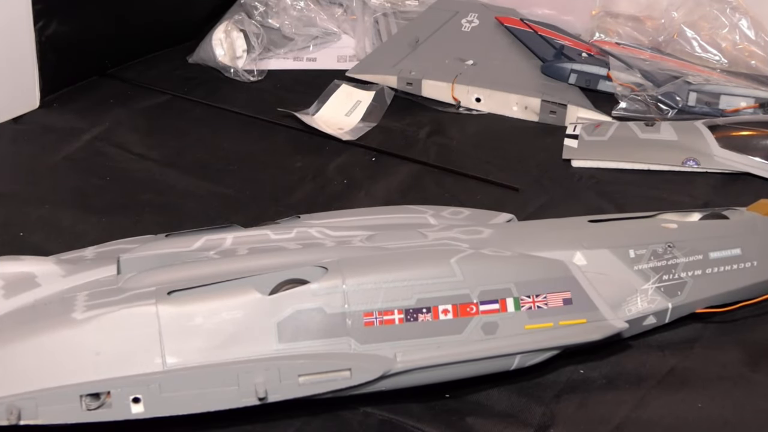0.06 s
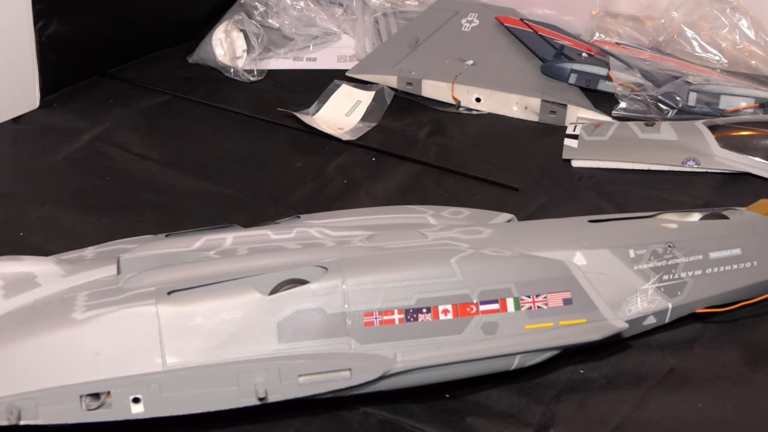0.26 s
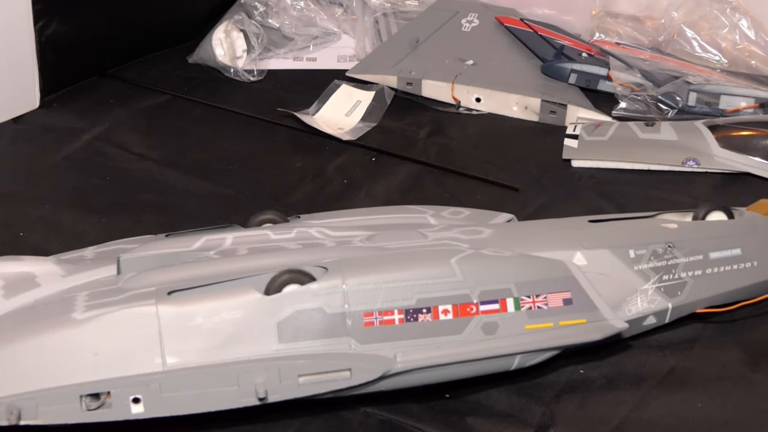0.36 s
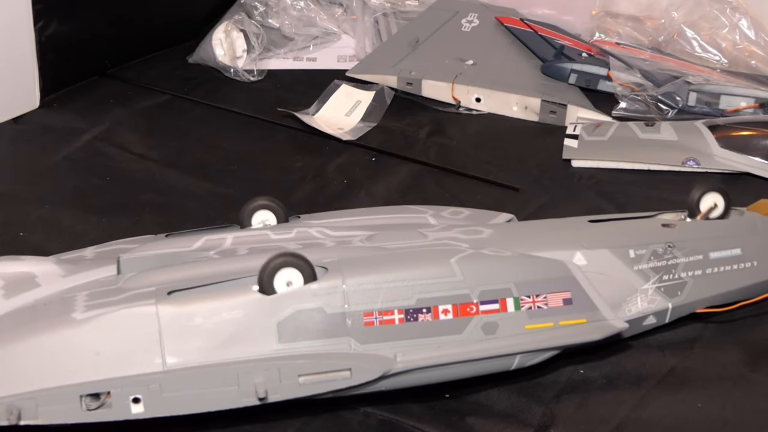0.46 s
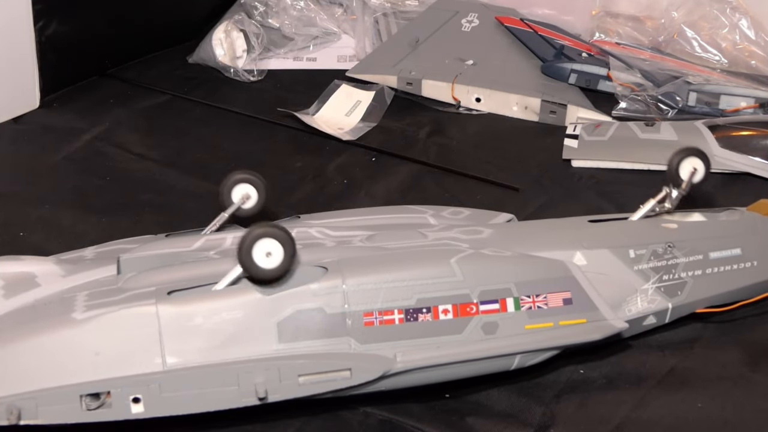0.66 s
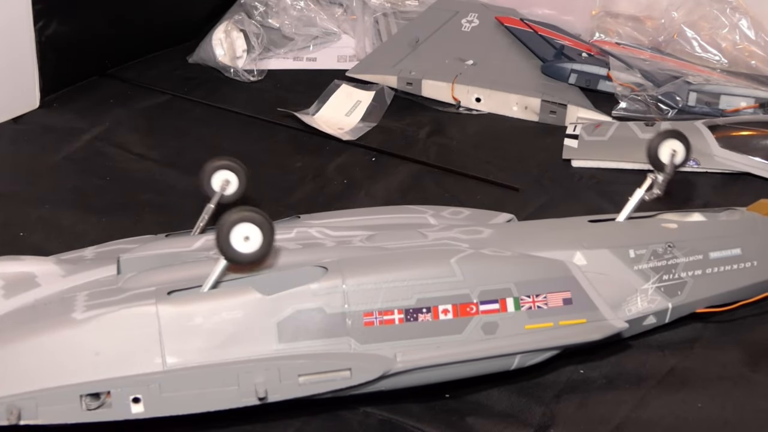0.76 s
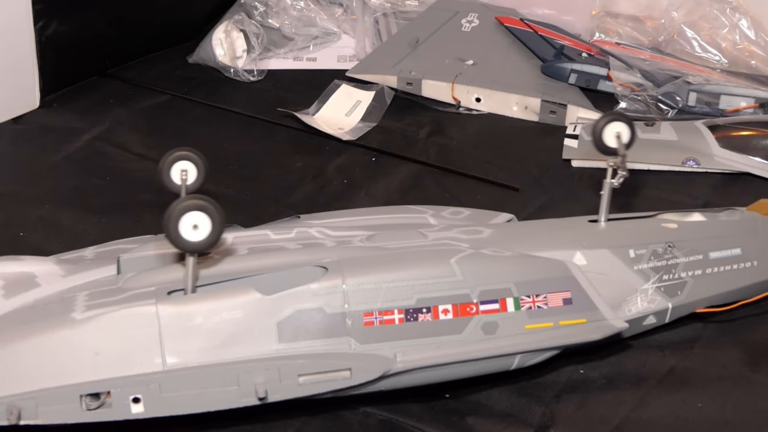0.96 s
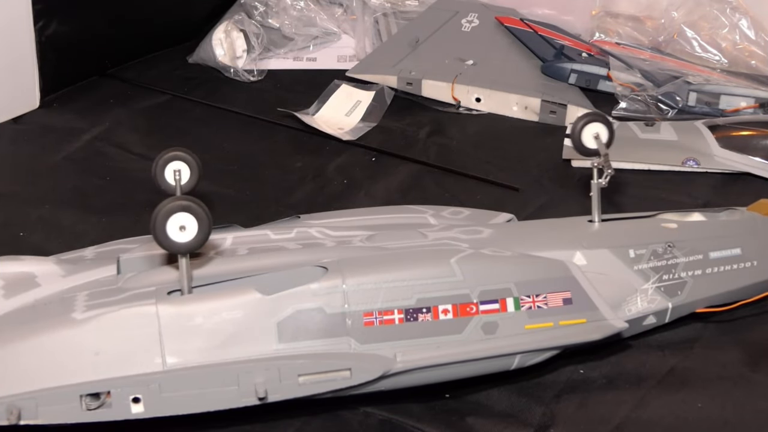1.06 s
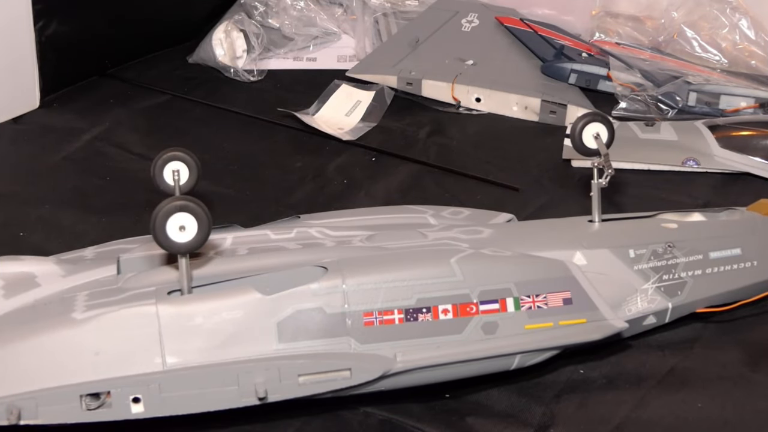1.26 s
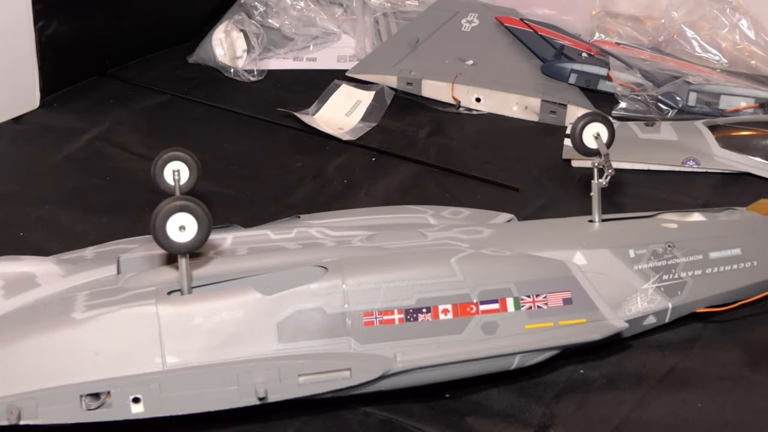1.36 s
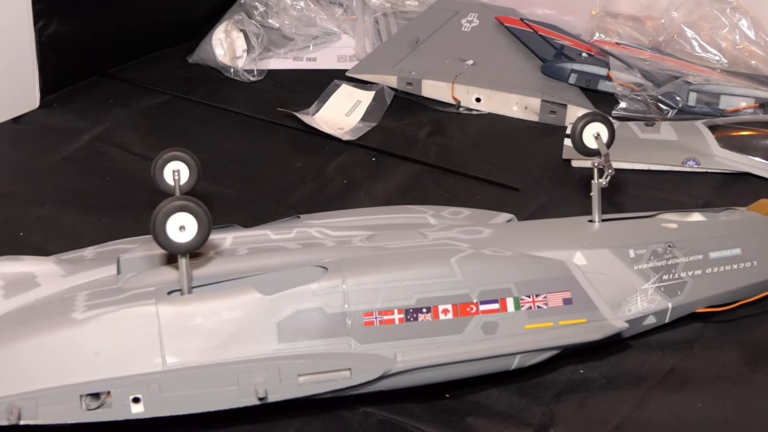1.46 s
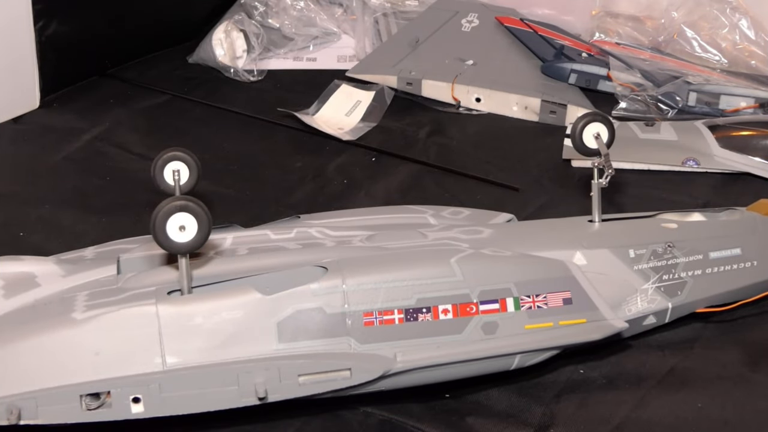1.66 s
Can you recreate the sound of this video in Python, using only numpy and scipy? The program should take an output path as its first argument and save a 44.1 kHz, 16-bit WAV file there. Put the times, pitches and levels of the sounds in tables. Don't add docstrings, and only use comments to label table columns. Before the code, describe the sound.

After a brief near-silent hush, a harsh buzzy servo-like whirr jumps in, sags slightly under load, ticks and knocks, rises as the legs lock, then coasts away in a small dry room, close microphone.

```python
import sys
import numpy as np
from scipy import signal
from scipy.fft import rfft, irfft, next_fast_len
from scipy.io import wavfile
from scipy.ndimage import uniform_filter1d, map_coordinates

SR = 44100
rng = np.random.default_rng(int(sys.argv[2]) if len(sys.argv) > 2 else 0)


def to_wav(s):
    ch = np.atleast_2d(s).T
    pcm = np.round(np.clip(ch, -1, 1) * 32767)
    wavfile.write(sys.argv[1], SR, pcm.astype(np.int16))


def level_to_linear(level):
    exponent = np.asarray(level, float) / 20
    return 10 ** exponent


N = 74970
TIME_S = np.arange(N) / SR
SIDES = np.array([[1], [-1]])

# (time [s], shaft speed [Hz], tooth load [dB])
NEAR_RUN = [(.185, 71.6, -5), (.212, 257.6, -10), (.26, 286.6, -23), (0.356, 287.4, -6), (.385, 259.7, 0.5),
            (.47, 263.7, 1), (0.571, 264.6, 6), (.62, 266.9, 4), (.71, 268.7, -1), (.75, 262.4, 5),
            (.79, 264.2, 4), (.82, 258.5, 0), (.92, 262.2, 0), (.97, 264.3, -4.5), (1.02, 266.4, -10),
            (1.051, 283.8, -19), (1.2, 284.5, -7.5), (1.27, 279.8, -6), (1.295, 280.8, 1),
            (1.33, 278.8, 0.5), (1.365, 276.8, -4)]
FAR_RUN = [(0.187, 79.7, 17), (.225, 274.4, -1), (.255, 286.5, -2.5), (.32, 286.8, 3), (.36, 287.4, 5),
           (.40, 270.3, 5), (0.471, 273.1, 8.5), (0.57, 270.7, -7), (.67, 270.3, -1), (.75, 272, -0.5),
           (0.878, 268.2, 4.5), (0.949, 274.4, -1), (0.992, 278.9, 9.5), (1.05, 282, 0),
           (1.085, 288.7, -11), (1.12, 295, -3), (1.165, 285.4, -4.5), (1.2, 289.6, -0.5),
           (1.25, 290.6, -2.5), (1.328, 282, -18)]
NOSE_RUN = [(.19, 147.4, 15), (.225, 299, 7), (0.251, 311.7, 10), (0.351, 309.9, 7), (0.41, 302.2, -2),
            (.6, 302.6, -12.5), (.8, 302.3, -4), (0.971, 305.8, -4), (1.081, 305.3, -0.5),
            (1.149, 309, -0.5), (1.336, 303.7, 2)]
# (multiple of shaft speed [-], level [dB], share of load followed [dB/dB], roughness [0-1])
NEAR_TONES = [(3, -48.5, 0.15, 0.2), (7, -57.5, -1.03, 0.26), (8, -40, -0.17, 0), (9, -30.5, 1.46, 0.63),
              (10, -48.5, 0.068, .6), (17, -54.5, 1, 0.3), (18, -38.5, 1.6, 0.11)]
FAR_TONES = [(3, -43.5, 0.1, 0.35), (8, -62.5, 0.26, 0.51), (9, -30.5, 0.6, 0.49), (10, -61, 2.5, 0.38),
             (16, -46, 1.2, 0.59), (17, -41, 0.58, 0.23), (18, -43, 0.54, 0.56)]
NOSE_TONES = [(3, -48, 0.53, 0.81), (3.95, -46.5, 0.62, 0.52), (4.42, -54.5, 2.06, 0.77),
              (9, -37, .4, 0.38), (14, -44.5, 0.35, 0.5)]
# (pan L-R [dB], coasting time [s], grinding [dB], waver [dB], speed scatter [%])
MOUNTS = [
    (-2, 0.28, -30.5, 3, 0.25),
    (-1.3, 0.29, -30.5, 0.3, 0.32),
    (1.8, 0.22, -31, 1.2, 0.3547),
]
# (time [s], level [dB])
DRIVE = [(.19, -10), (.35, -5), (.37, 1.5), (.6, -0.5), (.76, -2.5), (.92, 2.5), (1.0, 0), (1.07, 1),
         (1.14, 2.5), (1.2, 3.5), (1.23, -4.5), (1.36, -4)]
# (time [s], effort [dB])
EFFORT = [(0.187, -11), (.35, -8), (.375, 4.5), (.41, 2), (.6, -0.5), (0.698, 0.5), (.9, 0.5), (.97, -5),
          (1.0, 0.5), (1.025, -7.5), (1.045, -9.5), (1.17, -18.5), (1.24, -1.5), (1.331, -15.5),
          (1.36, -12.5)]
# (time [s], peak [dB])
PINION_SWELLS = [(0.3972, -16), (0.4047, -1), (0.4262, -8), (0.4373, -12), (0.4658, -16), (0.508, -12),
                 (0.5399, -21), (0.5927, -8), (0.6118, -13), (0.6317, -16.5), (0.6644, -12), (0.6986, -11),
                 (0.7344, 6), (0.7759, -11), (0.8183, -12), (0.8507, -7), (0.9125, -21), (0.9201, -10.5),
                 (1.0039, -9), (1.0328, -22), (1.1151, -18.5), (1.2034, -26.5), (1.2633, -20), (1.2918, -15)]
# (centre [Hz], width [Hz], boost [dB])
BODY_HUMPS = [(2425, 97, 4)]
# (frequency [Hz], density [dB per Hz])
GRIND_SPECTRUM = [(25, -55), (110, -39.5), (280, -27), (520, -33), (890, -24.5), (2600, -6), (12000, -19),
                  (15600, -34)]
# (centre [Hz], width [Hz], boost, or cut if negative [dB])
SHELL_HUMPS = [(900, 250, 2), (1240, 77, -2), (2098, 17, 2.5), (2360, 36, 4.5), (2700, 830, 1.5),
               (4210, 1500, 2.5), (6500, 2200, 3.5), (8500, 400, -5.5), (10120, 790, 6.5),
               (12900, 2100, -7.5)]
# (frequency [Hz], density [dB per Hz])
IDLE_SPECTRUM = [(100, -34), (300, -28), (600, -12), (1300, -1), (2000, -4), (3500, -15), (6000, -49.5)]
# (time [s], frequency [Hz], level [dB])
FOAM_SHAKE = [(0.19, 240.5, -78), (0.216, 259, -46), (0.238, 268, -41.5), (0.272, 286.5, -54),
              (0.306, 286.6, -48), (0.348, 286.5, -53), (0.368, 265, -40.5), (0.398, 260.2, -42.5),
              (0.7, 268.1, -45), (0.872, 256, -46), (0.908, 267.2, -42), (1.018, 283.2, -58),
              (1.11, 287.6, -44), (1.166, 264.3, -51.5), (1.244, 284.5, -59), (1.326, 281, -47),
              (1.342, 277.8, -63), (1.38, 263, -57)]
# (centre [Hz], width [Hz], level [dB])
STRAIN_MODES = [(4710, 690, 1.5), (2496, 100, -11), (6740, 1170, -10)]
# (time [s], level [dB], thump [Hz])
KNOCK_EVENTS = [
    (0.186, -44, 243.4),
    (0.363, -22, 373),
    (.379, -26.5, 368),
    (0.814, -26, 291),
    (1.001, -42, 353),
    (1.161, -28.5, 325),
    (1.194, -30, 450),
    (1.293, -29, 524),
    (1.319, -33, 296),
    (1.4, -34, 383),
]
# (centre [Hz], width [Hz], boost, or cut if negative [dB])
KNOCK_DIP = [(4860, 700, -3)]
# (time [s], peak [dB])
TOOTH_SLAPS = [(0.382, -10), (0.428, -10), (0.478, -16), (.714, -15), (.747, -14), (.853, -14),
               (0.986, -29), (1.006, -20.5), (1.227, -21), (1.294, -18), (1.317, -17), (1.327, -18),
               (1.403, -26.5)]
# (frequency [Hz], density [dB per Hz])
COAST_SPECTRUM = [(290, -55), (500, -25.5), (635, -22.5), (1040, 1.5), (1790, -2.5), (3170, 3),
                  (6770, -14.5), (12000, -34.5), (15600, -55.5), (22000, -120)]
# (frequency [Hz], left-right likeness [0-1])
GEAR_LIKENESS = [(60, 0.091), (180, 0.45), (550, 0.72), (1650, 0.76), (4970, 1), (9000, 0.9),
                 (15000, 0.308)]
# (frequency [Hz], depth [dB])
PATCH_DEPTH = [(300, 5.5), (3000, 1.5), (10000, 3.5), (12500, 4)]
# (frequency [Hz], T60 [s])
ROOM_T60 = [(200, 0.15), (2000, 0.17), (10000, 0.05)]
# (frequency [Hz], density [dB per Hz])
AIR_SPECTRUM = [(25, -23), (120, -6.5), (399, -2.5), (560, 1), (895, 0.5), (1900, -8.5), (8350, -22.5),
                (15600, -27)]
# (frequency [Hz], left-right likeness [0-1])
AIR_LIKENESS = [(60, 0.092), (500, 0.16), (5000, 0.53)]


def motor(run, orders, mount):
    pan_db, coast_s, grind_db, waver_db, scatter_pct = mount
    time_s, speed_hz, load = np.transpose(run)
    start_s, off_s = time_s[0], time_s[-1]
    load_db = np.interp(TIME_S, time_s, load)
    coasting = np.clip((TIME_S - off_s) / coast_s, 0, 1)
    shaft_hz = np.interp(TIME_S, time_s, speed_hz) * (TIME_S > start_s) * (1 - coasting)
    turns_rad = 2 * np.pi * np.cumsum(shaft_hz * (1 + scatter_pct / 100 * wobble(44.98))) / SR
    power = np.clip((off_s - TIME_S) / 0.021, 0, 1) * (TIME_S > start_s)
    speed = shaft_hz / speed_hz.max()
    tones = sum(whine(*order, turns_rad, shaft_hz, load_db, waver_db) for order in orders)
    tones = np.sqrt(2) * tones * power * speed ** 4.5
    noise = grinding(grind_db, speed, turns_rad, load_db, power)
    return (tones + noise) * level_to_linear(pan_db / 2 * SIDES)


def whine(multiple, db, follows, rough, turns_rad, shaft_hz, load_db, waver_db):
    errors_hz = 110
    errors = (wobble(errors_hz) + 1j * wobble(errors_hz)) / np.sqrt(2)
    fuzz = np.sqrt(1 - rough ** 2) + rough * errors
    phase_rad = multiple * turns_rad + 2 * np.pi * rng.random() + 0.38 * SIDES * wobble(9.6)
    level_db = db + follows * load_db + humps(BODY_HUMPS, multiple * shaft_hz)
    level_db = level_db + 2 * rough * waver_db * wobble(19.95) + 1.6 * SIDES * wobble(11.45)
    if multiple == 3:
        drive = level_to_linear(over_time(DRIVE))
    elif multiple >= 9:
        drive = pinion_swell()
    else:
        drive = 1
    return drive * level_to_linear(level_db) * np.real(fuzz * np.exp(1j * phase_rad))


def pinion_swell():
    usual_db, lag_s, width_s = -15, 0.002, 0.0034
    swell = sum(level_to_linear(db - usual_db) * np.exp(-((TIME_S - s - lag_s) / width_s) ** 2) for s, db in PINION_SWELLS)
    return level_to_linear(3.5 * np.clip(swell, 0, 1.5))


def grinding(grind_db, speed, turns_rad, load_db, power):
    treble_hz, idle_db, modes_db, modes_spacing_hz = 5570, -48, 2.5, 59.97
    uneven = level_to_linear(0.52 * wobble(64.0) + 2.02 * wobble(9.14))
    swell = (1 + 0.17 * np.cos(turns_rad)) * uneven
    level = swell * speed ** 1.6 * level_to_linear(grind_db + 0.12 * load_db - 4 * (0.5 - power))
    idle = level * level_to_linear(idle_db - grind_db - 0.56 * over_time(EFFORT))
    modes = rng.standard_normal(400)

    def colour(hz):
        small_db = modes_db * map_coordinates(modes, [hz / modes_spacing_hz])
        return level_to_linear(along(GRIND_SPECTRUM, hz) + humps(SHELL_HUMPS, hz) + small_db)

    whole = rush(colour, GEAR_LIKENESS, level) + rush(spectrum(IDLE_SPECTRUM), GEAR_LIKENESS, idle)
    treble = filtered(whole, lambda hz: hz ** 2 / (hz ** 2 + treble_hz ** 2))
    return whole - (1 - speed ** 2.7) * treble


def strain():
    lifting = (TIME_S > EFFORT[0][0]) & (TIME_S < EFFORT[-1][0])
    level_db = -27.5 + 1.5 * over_time(EFFORT) + 0.774 * wobble(59.75) + 0.6 * wobble(1.7)

    def ring(hz):
        modes = sum(level_to_linear(db) / (1 + (2 * (hz - c) / w) ** 2) for c, w, db in STRAIN_MODES)
        return modes * hz / (hz + 1500)

    return rush(ring, GEAR_LIKENESS, lifting * level_to_linear(level_db))


def knocks():
    rise_s, rattle_t60_s, thump_t60_s, thump_db, top_hz = 0.0012, 0.14, 0.025, -12.5, 7000
    bursts, thumps = np.zeros(N), np.zeros(N)
    for s, db, thump_hz in KNOCK_EVENTS:
        age_s = np.maximum(TIME_S - s, 0)
        rise = 1 - np.exp(-age_s / rise_s)
        bursts += rise * level_to_linear(db - 60 * age_s / rattle_t60_s)
        thump = np.sin(2 * np.pi * thump_hz * age_s)
        thumps += rise * level_to_linear(db + thump_db - 60 * age_s / thump_t60_s) * thump

    def colour(hz):
        return level_to_linear(along(GRIND_SPECTRUM, hz) + humps(KNOCK_DIP, hz)) / (1 + (hz / top_hz) ** 2)

    return rush(colour, GEAR_LIKENESS, bursts) + thumps


def hum():
    time_s, shake_hz, db = np.transpose(FOAM_SHAKE)
    phase_rad = 2 * np.pi * np.cumsum(np.interp(TIME_S, time_s, shake_hz)) / SR
    phase_rad = phase_rad + 0.23 * SIDES * wobble(8)
    level_db = np.interp(TIME_S, time_s, db, -120, -120) + wobble(40)
    return np.sqrt(2) * level_to_linear(level_db) * np.sin(phase_rad)


def ticks():
    t60_s, slaps = 0.0089, np.zeros(N)
    for s, db in TOOTH_SLAPS:
        age_s = TIME_S - s
        slaps += (age_s > 0) * level_to_linear(db - 6 - 60 * np.abs(age_s) / t60_s)
    return rush(spectrum(GRIND_SPECTRUM), GEAR_LIKENESS, slaps)


def coast():
    start_s, level_db, rise_s, fall_s, low_hz = 1.34, -30.5, 0.026, 0.33, 450
    age_s = np.maximum(TIME_S - start_s, 0)
    fall = np.clip(1 - age_s / fall_s, 0, 1) ** 2.2
    level = level_to_linear(level_db) * (1 - np.exp(-age_s / rise_s)) * fall
    colour = spectrum(COAST_SPECTRUM)
    return rush(lambda hz: colour(hz) * hz ** 2 / (hz ** 2 + low_hz ** 2), GEAR_LIKENESS, level)


def room(x):
    hz, time_s, z = signal.stft(rng.standard_normal((2, SR // 3)), SR, nperseg=256)
    decay = level_to_linear(-60 * time_s / along(ROOM_T60, hz)[:, None])
    tail = signal.istft(z * decay, SR, nperseg=256)[1]
    delayed = np.pad(x, (300, 0))[None]
    return signal.fftconvolve(delayed, tail / np.linalg.norm(tail[0]), axes=1)[:, :N]


def air():
    rustle_s, rustle_length_s, rustle_db = 0.097, 0.061, -66.5
    hush = rush(spectrum(AIR_SPECTRUM), AIR_LIKENESS, level_to_linear(-59 + 1.8 * wobble(36.0)))
    puff = level_to_linear(rustle_db + wobble(150)) * np.exp(-((TIME_S - rustle_s) / rustle_length_s) ** 2)
    return hush + rush(spectrum(GRIND_SPECTRUM), GEAR_LIKENESS, puff)


def rush(gain, likeness, envelope):
    def shape(hz):
        angle = np.arccos(np.clip(along(likeness, hz), -1, 1)) / 2
        return gain(hz) * np.array([np.cos(angle), np.sin(angle)])

    noise = patches(rng.standard_normal((2, N)))
    rms = np.std(np.sum(filtered(noise, shape), axis=0))
    mid, side = filtered(noise * envelope, shape) / rms
    return np.array([mid + side, mid - side])


def patches(x):
    hz, _, z = signal.stft(x, SR, nperseg=512)
    field = uniform_filter1d(rng.standard_normal(z.shape[1:]), size=3, axis=0)
    field = uniform_filter1d(field, size=6, axis=1)
    gain = level_to_linear(along(PATCH_DEPTH, hz)[:, None] * unit(field))
    return signal.istft(z * gain, nperseg=512)[1][:, :N]


def wobble(rate_hz):
    step = 16
    coarse = np.arange(0, N + step, step)
    knots = rng.standard_normal(N // step)
    return np.interp(np.arange(N), coarse, map_coordinates(knots, [coarse * rate_hz / SR]))


def filtered(x, response):
    m = next_fast_len(N + 8192)
    return irfft(rfft(x, m) * response(np.fft.rfftfreq(m, 1 / SR)), m)[..., :N]


def unit(x):
    return x / np.sqrt(np.mean(x ** 2) + 1e-20)


def over_time(points):
    return np.interp(TIME_S, *np.transpose(points))


def along(points, hz):
    f, v = np.transpose(points)
    return np.interp(np.log(hz + 1), np.log(f + 1), v)


def spectrum(points):
    return lambda hz: level_to_linear(along(points, hz))


def humps(rows, hz):
    return sum(db / (1 + (2 * (hz - c) / w) ** 2) for c, w, db in rows)


def scene():
    near = motor(NEAR_RUN, NEAR_TONES, MOUNTS[0])
    far = motor(FAR_RUN, FAR_TONES, MOUNTS[1])
    nose = motor(NOSE_RUN, NOSE_TONES, MOUNTS[2])
    gear = near + far + nose + strain() + knocks() + hum() + ticks() + coast()
    into_room = filtered(gear.mean(axis=0), lambda hz: hz / (hz + 598))
    return gear + level_to_linear(-10) * room(into_room) + air()


def band_limit(x):
    return signal.sosfilt(signal.butter(12, 15670, fs=SR, output="sos"), x)


def record(dry):
    mix = filtered(dry, lambda hz: hz < 15250)
    return band_limit(mix)


dry = scene()
out = record(dry)
to_wav(out)
```